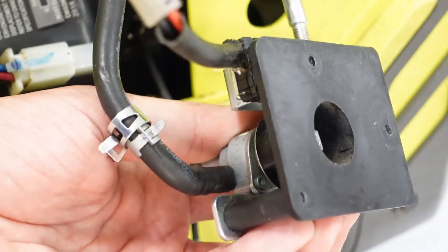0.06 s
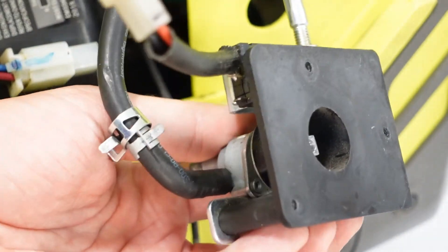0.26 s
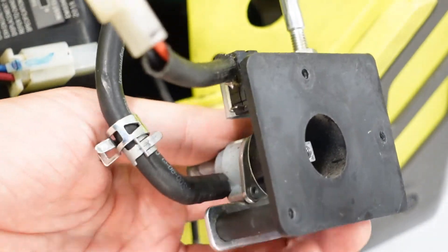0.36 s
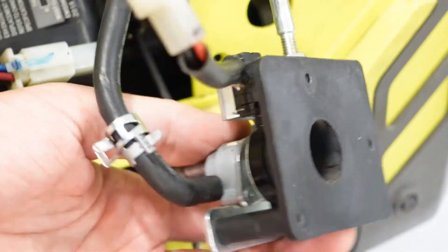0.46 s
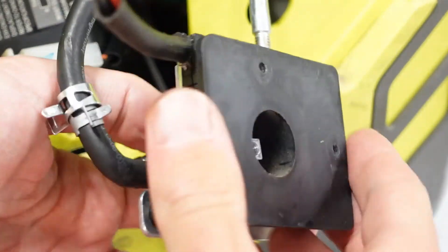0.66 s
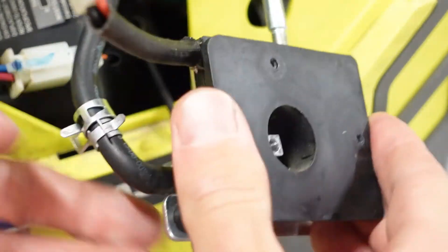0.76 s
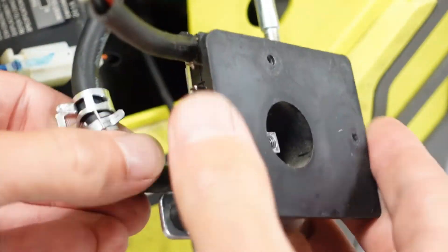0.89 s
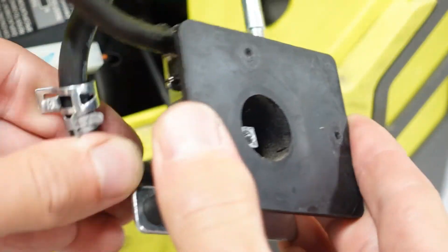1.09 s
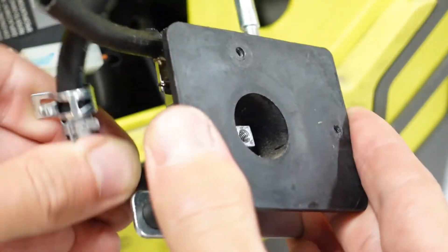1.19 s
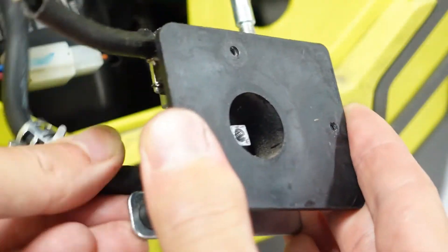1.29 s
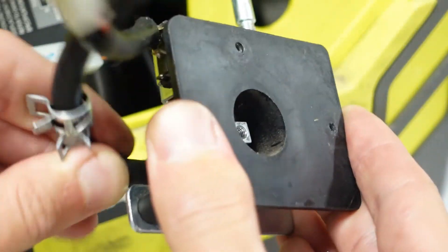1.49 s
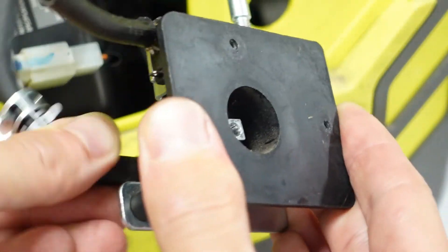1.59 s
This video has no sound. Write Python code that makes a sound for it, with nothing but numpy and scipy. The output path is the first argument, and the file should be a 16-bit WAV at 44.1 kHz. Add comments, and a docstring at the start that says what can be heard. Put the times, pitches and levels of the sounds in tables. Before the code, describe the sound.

Pliers are put down on a hollow panel in a small, quiet workshop, close to the microphone. Soft padded bumps and gritty scuffing come at 0.2 s, then a loud boxy knock at 0.33 s with a bright steel snap at 0.34 s, lighter bounces and a short room tail by 0.4 s. A faint tick follows at 0.58 s, then barely audible hose nudges, with tiny rubber squeaks near 0.97 and 1.43 s.

```python
"""Pliers put down on a hollow panel

Pliers used on a spring hose clamp are put down on a hollow panel in a small workshop with a faint hum.
The padded handles bump and scuff first: soft pushes on the panel, bursts of noise and uneven grit.
Then the tool drops with a knock that makes the panel ring, and its steel jaws snap with short bright rings.
Fingers then work the clamp along the rubber hose: faint ticks, nudges and brushing made of shaped noise,
and two short squeaks built from multiples of a wavering slip rate."""
import sys
import numpy as np
from scipy import signal
from scipy.fft import rfft, irfft
from scipy.io import wavfile
from scipy.ndimage import uniform_filter1d

SR = 44100
rng = np.random.default_rng(int(sys.argv[2]) if len(sys.argv) > 2 else 0)


def pcm_store(signal):
    """Save signal as 16-bit PCM."""
    levels = np.round(np.clip(np.atleast_2d(signal), -1, 1) * 32767)
    wavfile.write(sys.argv[1], SR, levels.astype(np.int16).T)


N = 72765  # length in samples

# Spectrum of the workshop air. Each row: frequency in Hz, relative level in dB.
AIR_SPECTRUM = [(15, -35.5), (25, -5.5), (180, -2.5), (373, -12.5), (427, -8), (463, -9), (503, -5.5),
                (695, -14), (754, -11), (1560, -19.5), (2050, -20.5), (8360, -24.5), (16000, -27.5)]
AIR_DB = -67.5
HUM_HZ, HUM_WIDTH_HZ, HUM_DB = 492, 9.1, -80.5

# The handles scuff over the panel. Each row: start in seconds, length in seconds, level in dB, resonance in Hz.
HANDLE_SCUFFS = [(.212, 0.011, -27, 412), (.209, .032, -35, 620), (.228, .015, -41, 280),
                 (.258, 0.026, -49, 330)]
SCUFF_WIDTH_HZ = 138
# Spectrum of the dry grit under the handles. Each row: frequency in Hz, level in dB.
GRIT_SPECTRUM = [(150, -20.5), (500, 0), (1200, -4), (2050, -3), (2600, -12), (3200, -9), (3700, -14),
                 (5000, -15), (10000, -22), (15000, -32)]
GRIT_START_S, GRIT_LENGTH_S, GRIT_DB, GRIT_SPREAD_DB = 0.2075, 0.029, -33, 6.5

# Soft bumps of the handles. Each row: start in seconds, level in dB, brightness in Hz.
HANDLE_BUMPS = [(0.2089, -26.5, 900), (.2135, -26, 600), (0.2158, -22.5, 500), (0.2216, -26, 500),
                (0.233, -30.5, 1200)]
# Hard knocks of the tool. Each row: start in seconds, level in dB, brightness in Hz.
TOOL_KNOCKS = [(0.326, 0, 2700), (.3294, -10.5, 1080), (.3329, 0, 338.7), (0.3395, -14, 390),
               (0.3475, -10, 350), (.3634, -5, 221), (.3889, -10, 170)]
# Ringing tones (modes) of the panel. Each row: frequency in Hz, level in dB, time to fade by 60 dB in seconds.
PANEL_MODES = [(131.85, -33.5, .28), (148, -24, .094), (200, -38, .076), (298.4, -29.5, 0.16),
               (371, -18, .067), (413.6, -24, .15), (535, -24.5, .15), (609.7, -15, 0.047),
               (682.5, -12, .034), (1038, -16, 0.06), (1106, -30, .03), (1410, -33, 0.08),
               (1624, -37, 0.19), (1741, -38, .17)]
# Spectrum of a crowd of weaker panel modes. Each row: frequency in Hz, level in dB.
CROWD_SPECTRUM = [(60, -19), (130, -14.5), (400, -5.5), (750, 3.5), (1300, -4), (2000, -4.5), (4000, -16.5),
                  (10000, -16.5), (16000, -26.5)]
CROWD_DB, CROWD_T60_S = -4, 0.05
PUSH_HZ, PUSH_DB, PUSH_T60_S = 950, 0, 0.0012  # the panel giving way
LOW_CUT_HZ = 80

# Snaps of the steel jaws and ticks of the clamp. Each row: start in seconds, level in dB.
STEEL_SNAPS = [(.3257, -23.5), (0.3305, -20.5), (.3399, -8.5), (.3401, 0.5), (0.3408, -6), (0.576, -38.5),
               (0.804, -61), (0.972, -44)]
# Ringing tones of the steel. Each row: frequency in Hz, level in dB, time to fade by 60 dB in seconds.
STEEL_MODES = [(2774, -18.5, 0.0038), (5464, -22, 0.0058), (8060, -21, .004), (10514, -17, 0.0083),
               (11400, -19.5, 0.0026)]
CRACK_HZ, CRACK_DB, CRACK_T60_S = 6000, -9, 0.0004
STEEL_TOP_HZ = 11960

# Fingers nudge the hose. Each row: start in seconds, length in seconds, level in dB, resonance in Hz.
HOSE_NUDGES = [(0.713, 0.029, -64.5, 170), (.785, 0.038, -70, 454), (.85, 0.024, -68.5, 514),
               (.968, 0.014, -64, 536), (1.117, 0.022, -69, 514), (1.262, 0.04, -64, 511),
               (1.424, .036, -64, 630), (1.463, 0.0332, -65, 600)]
NUDGE_WIDTH_HZ = 280
# Skin brushes the hose. Each row: start in seconds, length in seconds, level in dB.
SKIN_BRUSHES = [(.52, .08, -70.5), (0.787, 0.028, -71.5), (.945, 0.054, -79)]
BRUSH_HZ, BRUSH_WIDTH_HZ = 8900, 11300
# The rubber squeaks under the clamp. Each row: start in seconds, length in seconds, level in dB, slips per second.
RUBBER_SQUEAKS = [(.968, 0.0071, -56.5, 296), (1.426, .012, -53.5, 284), (1.4356, 0.0085, -51, 330),
                  (1.442, 0.02, -52, 322), (1.46, 0.045, -69.5, 325)]
# Tones within a squeak. Each row: multiple of the slip rate, relative level in dB.
SLIP_MULTIPLES = [(1, -11), (2, -21), (3, 1.5), (4, -12), (5, -25), (10, -35)]
SLIP_JITTER = 0.043  # typical wander of the slip rate, as a fraction

# Colour of the room's answer to the panel. Each row: frequency in Hz, level in dB.
ROOM_PANEL_COLOUR = [(50, -3), (130, 6), (230, 12), (420, 13), (620, 11), (850, 6.5), (1250, 2),
                     (1700, 6.5), (2600, 2), (4000, -8.5), (10000, -12.5), (16000, -22)]
# Colour of the room's answer to the steel. Each row: frequency in Hz, level in dB.
ROOM_STEEL_COLOUR = [(300, 2), (1600, 5.5), (2800, 4), (4000, -2.5), (5500, -0.5), (7000, -2), (9500, 1.5),
                     (11500, -5), (12700, -9.5), (16000, -13)]
# How fast the room fades. Each row: frequency in Hz, time to fade by 60 dB in seconds.
ROOM_FADE = [(100, .22), (500, .18), (2000, 0.19), (6000, 0.19), (14000, 0.094)]
ROOM_PANEL_DB, ROOM_STEEL_DB, ROOM_GRIT_DB = 2.5, -6, -3
ROUND_TRIP_S, FLUTTER = 0.03, 0.68  # FLUTTER: share of the fading that comes in steps, 0 to 1
PANEL_DELAY_S, STEEL_DELAY_S = 0.01, 0.0017  # the room answers the panel later than the steel

EDGE_HZ = 15900


def amp(db):
    """Turns decibels into a gain."""
    return 10 ** (np.asarray(db) / 20)


def evened(x):
    """Scales a sound so that its average strength (rms) is 1."""
    return x / np.sqrt(np.mean(x ** 2) + 1e-20)


def read(points, hz):
    """Reads between the rows of a table, with frequency on a logarithmic scale."""
    f, value = np.transpose(points)
    return np.interp(np.log(hz + 1), np.log(f + 1), value)


def add(mix, start_s, sound):
    """Mixes a sound in at a given time, cutting what runs past the end."""
    part = mix[round(start_s * SR):][:len(sound)]
    part += sound[:len(part)]


def through(x, response):
    """Passes a sound through a response by convolution and keeps its length."""
    return signal.fftconvolve(x, response)[:len(x)]


def colour(x, points, size=4096):
    """Filters a sound to the given spectrum, with nothing heard ahead of its cause."""
    hz = abs(np.fft.fftfreq(size, 1 / SR))
    log_gain = np.log(amp(read(points, hz)))
    # the Hilbert transform finds the phase that puts the response after time zero
    spectrum = np.exp(np.conj(signal.hilbert(log_gain)))
    return through(x, np.fft.ifft(spectrum).real[:size // 2])


def band_noise(hz, width_hz):
    """Makes noise gathered around one resonance."""
    f = np.fft.rfftfreq(N, 1 / SR)
    spread = 1 + (2 * (f - hz) / width_hz) ** 2
    return evened(irfft(rfft(rng.standard_normal(N)) / spread, N))


def arch(length_s):
    """Makes a rounded swell from silence to silence."""
    half_turn = np.pi * np.linspace(0, 1, max(round(length_s * SR), 2))
    return np.sin(half_turn).clip(0) ** 0.5


def rub(mix, start_s, length_s, db, hz, width_hz):
    """Adds one swelling burst of resonant noise, evened over the burst."""
    swell = arch(length_s)
    noise = evened(band_noise(hz, width_hz)[:len(swell)])
    add(mix, start_s, amp(db) * swell * noise)


def ring(modes):
    """Adds up the dying tones that follow one blow."""
    t = np.arange(SR // 2) / SR
    return sum(amp(db - 60 * t / t60_s) * np.sin(2 * np.pi * hz * t) for hz, db, t60_s in modes)


def room(x, points, delay_s):
    """Makes a short dense tail of fading noise that loses a step of level on each trip across the room."""
    f, t, noise = signal.stft(rng.standard_normal(SR // 2), SR, nperseg=128)
    stepped_time = ROUND_TRIP_S * np.floor(t / ROUND_TRIP_S)
    age = (1 - FLUTTER) * t + FLUTTER * stepped_time
    fade = amp(-60 * age / read(ROOM_FADE, f)[:, None])
    tail = signal.istft(noise * fade, SR, nperseg=128)[1]
    tail = np.r_[np.zeros(round(delay_s * SR)), tail / np.linalg.norm(tail)]
    return colour(through(x, tail), points)


def air():
    """Quiet workshop air is shaped noise; the faint wavering hum is a very narrow band of noise."""
    spectrum = amp(read(AIR_SPECTRUM, np.fft.rfftfreq(N, 1 / SR)))
    wash = irfft(rfft(rng.standard_normal(N)) * spectrum, N)
    return amp(AIR_DB) * evened(wash) + amp(HUM_DB) * band_noise(HUM_HZ, HUM_WIDTH_HZ)


def handles():
    """The padded handles slide briefly: short groans of the panel and uneven grit."""
    groans, grit = np.zeros(N), np.zeros(N)
    for start_s, length_s, db, hz in HANDLE_SCUFFS:
        rub(groans, start_s, length_s, db, hz, SCUFF_WIDTH_HZ)
    grains = rng.standard_normal(N)
    # a random level for every sample makes the grit uneven
    grains = evened(grains * amp(GRIT_SPREAD_DB * rng.standard_normal(N)))
    swell = arch(GRIT_LENGTH_S)
    add(grit, GRIT_START_S, amp(GRIT_DB) * swell * grains[:len(swell)])
    direct_grit = colour(grit, GRIT_SPECTRUM)
    return groans + direct_grit + amp(ROOM_GRIT_DB) * room(grit, GRIT_SPECTRUM, PANEL_DELAY_S)


def panel():
    """Each blow is a force pulse, shorter when brighter; the panel gives way, rings and stirs the room."""
    out, t = np.zeros(N), np.arange(SR // 2) / SR
    # neighbouring modes swing in opposite senses
    body = ring(PANEL_MODES[::2]) - ring(PANEL_MODES[1::2])
    body = body + ring([(PUSH_HZ, PUSH_DB, PUSH_T60_S)])
    for start_s, db, bright_hz in HANDLE_BUMPS + TOOL_KNOCKS:
        pulse = t * np.exp(-4 * np.pi * bright_hz * t)
        force = amp(db) * pulse / pulse.sum()
        crowd = colour(rng.standard_normal(len(t)) * amp(-60 * t / CROWD_T60_S), CROWD_SPECTRUM)
        crowd = amp(CROWD_DB) * crowd / np.linalg.norm(crowd)
        add(out, start_s, through(force, body + crowd))
        add(out, start_s, amp(ROOM_PANEL_DB) * room(force, ROOM_PANEL_COLOUR, PANEL_DELAY_S))
    # little deep bass is radiated
    low_cut = signal.butter(2, LOW_CUT_HZ, "high", fs=SR, output="sos")
    return signal.sosfilt(low_cut, out)


def steel():
    """Steel meets steel: a crack, very short bright rings, and their splash in the room."""
    direct, splash = np.zeros(N), np.zeros(N)
    snap = ring(STEEL_MODES) + ring([(CRACK_HZ, CRACK_DB, CRACK_T60_S)])
    click = signal.unit_impulse(SR // 2)
    for start_s, db in STEEL_SNAPS:
        add(direct, start_s, amp(db) * snap)
        add(splash, start_s, amp(db) * room(click, ROOM_STEEL_COLOUR, STEEL_DELAY_S))
    top_cut = signal.butter(4, STEEL_TOP_HZ, fs=SR, output="sos")
    return signal.sosfilt(top_cut, direct) + amp(ROOM_STEEL_DB) * splash


def hose():
    """Dull nudges and dry brushing are noise; the rubber squeaks by sticking and slipping at a wavering rate."""
    out = np.zeros(N)
    for start_s, length_s, db, hz in HOSE_NUDGES:
        rub(out, start_s, length_s, db, hz, NUDGE_WIDTH_HZ)
    for start_s, length_s, db in SKIN_BRUSHES:
        swell = arch(length_s)
        add(out, start_s, amp(db) * swell * band_noise(BRUSH_HZ, BRUSH_WIDTH_HZ)[:len(swell)])
    for start_s, length_s, db, slip_hz in RUBBER_SQUEAKS:
        swell = arch(length_s)
        waver = evened(uniform_filter1d(rng.standard_normal(N), size=80))[:len(swell)]
        slips = np.cumsum(slip_hz * (1 + SLIP_JITTER * waver)) / SR  # slips counted so far
        tones = sum(amp(tone_db) * np.sin(2 * np.pi * round(multiple) * slips)
                    for multiple, tone_db in SLIP_MULTIPLES)
        add(out, start_s, amp(db) * swell * evened(tones))
    return out


def scene():
    """Mixes the panel, the handles, the steel, the hose and the air into one channel."""
    return (panel() + handles() + steel() + hose() + air())[None]


def record(dry):
    """Limits the band by cutting the treble above EDGE_HZ."""
    top_cut = signal.firwin(511, EDGE_HZ, window=("kaiser", 9), fs=SR)
    return signal.oaconvolve(dry, top_cut[None], "same")


dry = scene()
out = record(dry)
pcm_store(out)
```